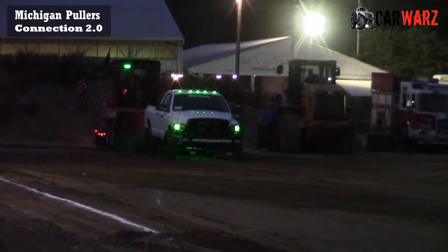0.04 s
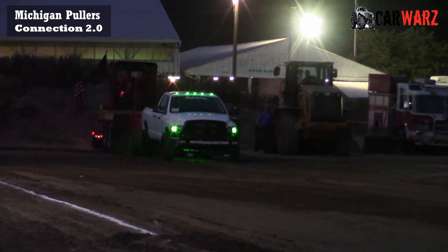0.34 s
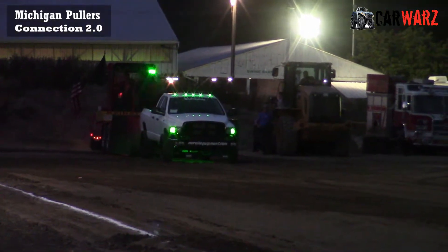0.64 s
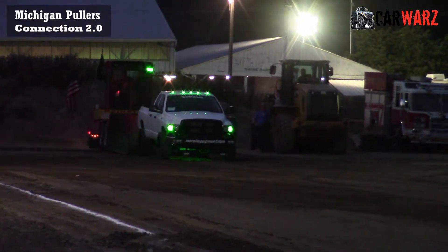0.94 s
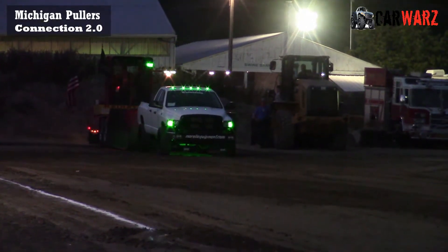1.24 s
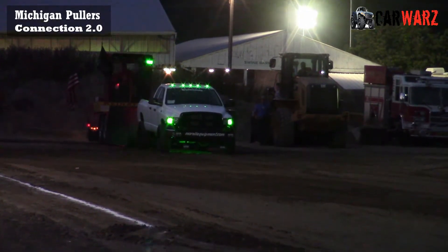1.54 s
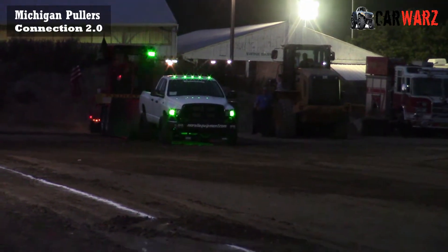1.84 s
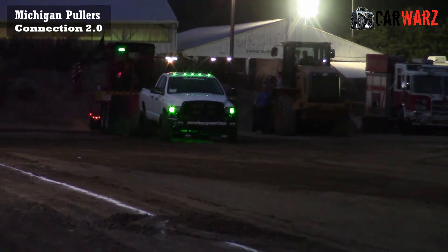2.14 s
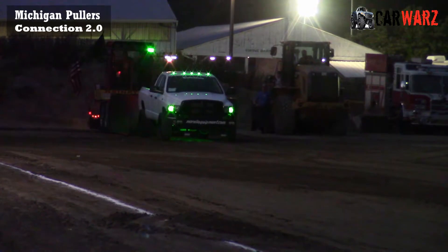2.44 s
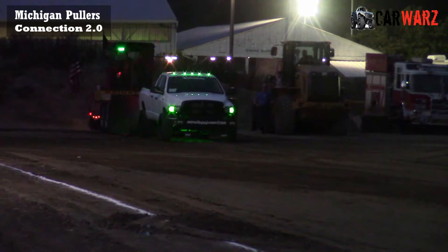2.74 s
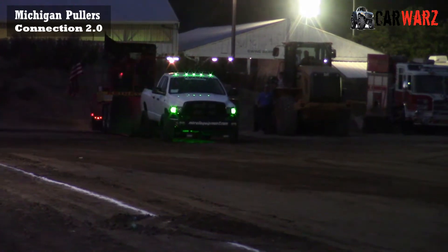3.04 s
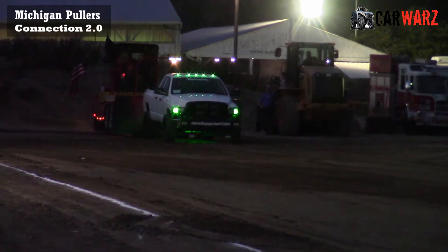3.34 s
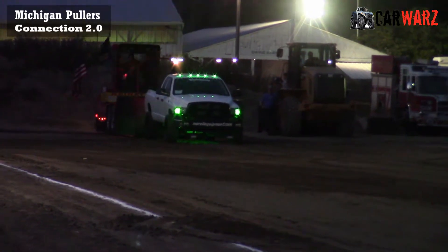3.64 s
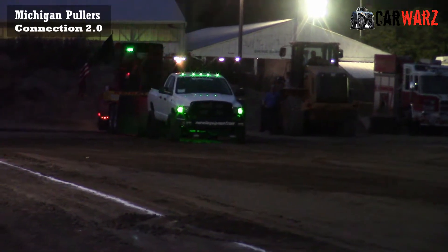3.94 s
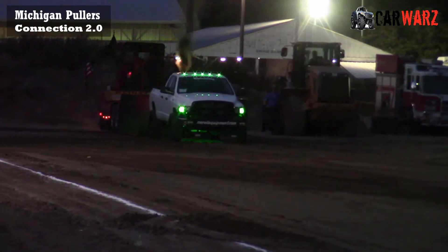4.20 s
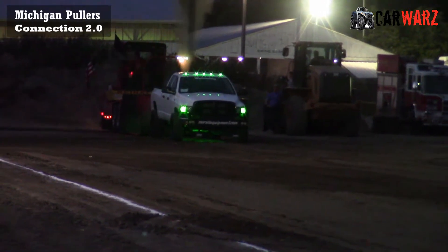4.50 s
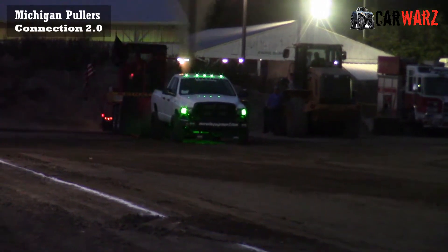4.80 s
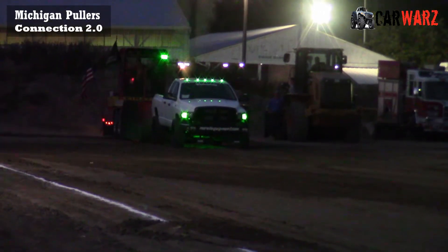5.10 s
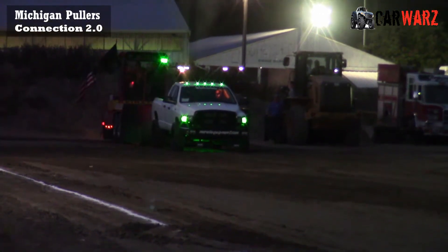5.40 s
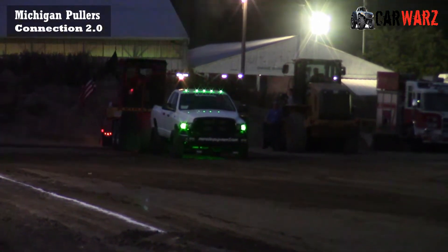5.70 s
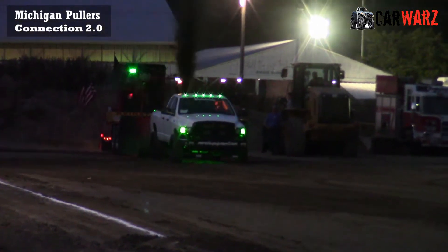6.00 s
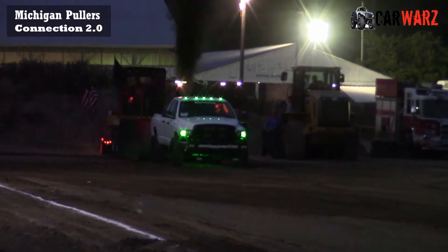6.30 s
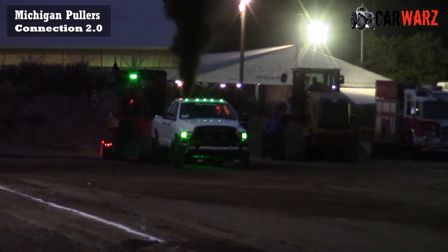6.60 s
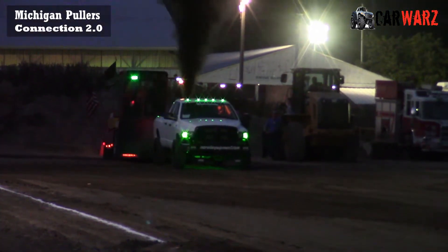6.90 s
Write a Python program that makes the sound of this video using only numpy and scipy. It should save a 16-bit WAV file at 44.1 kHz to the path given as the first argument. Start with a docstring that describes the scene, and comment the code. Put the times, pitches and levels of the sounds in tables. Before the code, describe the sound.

A turbo diesel pickup is already at full throttle, dragging a weight sled on an open dirt track some way off. Its loud exhaust drone, mixed with an uneven rattle and a gassy rasp, rises slowly in pitch and grows stronger, thinning briefly around 1.4 seconds. Tyres and sled add a low rumble, strongest near 1.7 and 4.5 seconds. From the start a thin, fluttering turbo whistle climbs over a hiss of air, becoming very high and fainter by 6 seconds. Two deep thuds come at about 4.6 and 4.8 seconds, the second stronger. At about 6.5 and 6.7 seconds the revs jump and drop as the throttle is cut and reapplied. The exhaust hardens into an even, crackling, metallic bark that continues to the end, just after 7 seconds. Faint short echoes return from the trackside.

```python
"""On an open dirt track, some way off, a six-cylinder turbo diesel pickup drags a rumbling weight sled.
Periodic firing makes the exhaust stack drone; unequal cylinders add a rattle, and turbulent puffs of gas
roar and rasp in the pipe. The turbo's blade tone winds up to a thin whistle over rushing air. Two deep
thuds pass midway. Near the end the revs bounce twice as the throttle is cut and reapplied, and the
exhaust turns to a hard, even bark."""
import sys
import numpy as np
from scipy import signal
from scipy.fft import rfft, irfft, next_fast_len
from scipy.io import wavfile
from scipy.ndimage import uniform_filter1d

SR = 44100
rng = np.random.default_rng(int(sys.argv[2]) if len(sys.argv) > 2 else 0)


def dump(signal):
    """Clip the signal to [-1, 1] and save it as 16-bit WAV at the path in sys.argv[1]."""
    limited = np.clip(np.atleast_2d(signal).T, -1, 1)
    pcm = np.round(limited * 32767).astype(np.int16)
    wavfile.write(sys.argv[1], SR, pcm)


N = 315315
TIME = np.arange(N) / SR

# Levels are relative; an order is a multiple of the four-stroke cycle rate (six firings).
# engine speed under load: time_s, firing_hz
ENGINE_SPEED = [(0.0, 177.2), (0.55, 181.3), (0.95, 185.9), (1.55, 193.6), (2.15, 198.5), (2.5, 199.4),
                (2.85, 201.1), (3.55, 207.7), (3.75, 209.2), (4.35, 212.2), (4.8, 216.8), (5.8, 227.5),
                (5.95, 226.5), (6.1, 224.5), (6.29, 225.8), (6.4, 247.0), (6.57, 240.5), (6.66, 242.0),
                (6.75, 238.8), (6.82, 247.0), (6.9, 244.6), (7.05, 242.5), (7.15, 234.7)]
# fundamental of the stack: time_s, level_db
DRONE_LEVEL = [(0.0, -12), (1.0, -12.5), (1.25, -18), (1.5, -18.5), (1.65, -15), (2.05, -13.5), (3.2, -9),
               (3.65, -11.5), (4.65, -8.5), (4.85, -9.5), (5.24, -6), (5.4, -8), (6.25, -7), (6.34, -10),
               (6.39, -10), (7.05, -7.5), (7.15, -8.5)]
# hardness of the blow-down, heard at twice the firing rate: time_s, level_db
BARK_LEVEL = [(0, -35.5), (.95, -44), (1.14, -24), (1.44, -17), (3.3, -34), (4.8, -26.5), (5.25, -33.5),
              (6, -29), (6.26, -19), (6.35, -25), (6.42, -18.5), (6.51, -20), (6.555, -22.5), (6.605, -20),
              (6.76, -26.5), (6.86, -14.5), (7.0, -17.5), (7.15, -42)]
# imbalance of the cylinders: time_s, even_orders_db, odd_orders_db
IMBALANCE = [(0, -27, -19), (1, -20.5, -16.5), (1.7, -18, -17.5), (2.8, -20.5, -18.8), (3.6, -24, -22),
             (4.5, -21.5, -23.5), (5.2, -24.5, -23.5), (5.8, -23, -20.5), (6.3, -22, -31),
             (7.15, -20.5, -31)]
# spectral lines of the unequal cylinders: order, level_db
LOPE_ORDERS = [(2, -10.2), (3, -19.7), (4, -8.1), (5, -11.9), (7, -2.7), (8, -5.9), (9, -12.6), (10, -6.9),
               (11, -19.1), (13, -14.5), (14, -9.8), (15, -19.2), (16, -10.3), (17, -16.5), (18, -19.3),
               (19, -21.4), (20, -15.5), (21, -21.8), (22, -18.0), (23, -21.5), (24, -20.8), (25, -27.2),
               (26, -18.4), (27, -23.2), (28, -21.9), (29, -30.1), (30, -26.0), (31, -28.3), (32, -26.5),
               (33, -26.5), (34, -30.7), (35, -33.6), (36, -31.9), (37, -34.2)]
# peaks and dips of pipe and trackside: centre_hz, half_width_hz, gain_db, strongest_s, reach_s
TRACK_RESONANCES = [(50, 163, -11.0, 6.73, 0.4), (70, 18, 5.0, 5.27, 0.87), (84, 17, -12.5, 3.1, 0.92),
                    (109, 16, 11.0, 3.75, 0.77), (128, 24, -13.5, 4.9, 0.39), (133, 8, 4.0, 1.88, 0.81),
                    (158, 14, -13.0, 0.99, 2.09), (232, 17, -9.0, 0.31, 0.31), (255, 15, -16.0, 1.85, 0.81),
                    (260, 8, -8.0, 5.81, 0.6), (276, 21, -11.0, 6.96, 0.58), (283, 21, -7.5, 3.35, 0.26),
                    (284, 17, 7.5, 1.4, 0.75), (286, 11, 10.0, 4.19, 0.62), (300, 14, -5.5, 0.08, 0.26),
                    (327, 14, 7.0, 0.06, 0.47), (340, 8, 10.0, 2.24, 2.2), (351, 95, -5.0, 4.42, 1.01),
                    (396, 12, -12.0, 0.65, 0.52), (414, 20, 13.0, 5.65, 0.59), (426, 16, 11.0, 0.88, 1.01),
                    (451, 10, -12.0, 0.0, 2.12), (463, 29, -16.0, 3.47, 0.4), (480, 10, -7.5, 5.29, 0.35),
                    (531, 17, -5.0, 2.49, 0.27), (534, 10, -12.5, 1.12, 0.35), (549, 11, 12.5, 4.53, 2.5),
                    (556, 56, -10.0, 7.01, 1.44), (562, 16, 3.5, 4.1, 0.4), (599, 12, 9.0, 3.45, 0.56),
                    (636, 23, 10, 2.95, 0.1), (651, 15, 7.0, 0.0, 1.95), (653, 21, 12.5, 5.49, 0.45),
                    (697, 12, 7.0, 5.1, 0.38), (699, 14, 7.0, 3.77, 0.33), (720, 16, 11.5, 0.21, 0.45),
                    (735, 12, 4, 6.9, 0.2), (741, 24, 9.0, 6.94, 0.5), (764, 78, 6.0, 2.42, 0.35),
                    (771, 51, -12.0, 4.05, 0.62), (857, 189, -10.0, 6.63, 0.16), (915, 28, 13, 6.45, 0.3),
                    (922, 14, 9.0, 3.53, 2.5), (925, 22, 4.5, 4.3, 0.55), (1010, 21, 10.5, 3.85, 0.39),
                    (1100, 60, 6, 6.9, 0.3)]
# turbulence in the stack: time_s, level_db
ROAR_LEVEL = [(0, -29), (.75, -32), (1.25, -25), (2.8, -25), (2.95, -22), (3.12, -31), (4, -31),
              (4.3, -26.5), (6, -29.5), (6.45, -29), (6.8, -33), (7.15, -33.5)]
# spectrum of the roar: frequency_hz, level_db
ROAR_SPECTRUM = [(70, -30.5), (130, -4), (220, -1), (420, -5), (650, -7), (930, -15), (1250, -30),
                 (2000, -32)]
# shock of each cylinder in firing order: level_db
CYLINDER_LEVELS = [0, -7, -5, -.5, -7, -4.5]
# exhaust rasp: time_s, level_db
RASP_LEVEL = [(0, -38), (1.1, -36), (1.6, -34), (2.15, -36.5), (2.65, -34.5), (2.88, -32), (3.2, -35),
              (4.0, -35), (4.5, -34.5), (4.8, -36), (5.45, -36), (5.68, -31.5), (6, -33), (6.4, -31.5),
              (6.72, -33), (6.9, -30), (7.05, -30.5), (7.15, -35)]
# response of the stack's mouth: frequency_hz, level_db
RASP_SPECTRUM = [(500, -15), (1000, 7.5), (1300, 1.5), (1550, 6), (1900, -1), (2300, 1), (2750, 7.5),
                 (3100, 6), (3500, -10), (4500, -12.5), (7000, -37.5)]
# sharpness of the rasp: time_s, cracks_over_hiss_db
CRACK_RATIO = [(0, -13), (3, -11.5), (5.3, -8.5), (5.7, -11), (6.25, -3), (6.45, -3.5), (6.56, -7),
               (6.66, -3), (6.76, -1), (6.88, 3.5), (7.0, 2.5), (7.15, -2.5)]
# metallic overtones of the bark: order, level_db
SNARL_ORDERS = [(38, -8), (40, -15), (44, -16), (50, -16), (52, -19), (56, -15), (58, -14), (62, -17),
                (64, -14), (66, -11), (68, -15), (70, -15), (72, -13), (74, -15), (76, -18), (78, -17),
                (84, -20), (86, -20)]
# blade tone of the turbo: time_s, pitch_hz
TURBO_PITCH = [(0.0, 4625), (0.6, 4885), (1.92, 5806), (2.96, 6275), (4.44, 7833), (5.2, 9160),
               (5.98, 10500), (6.1, 10960), (6.3, 12100), (6.46, 12380), (6.56, 12720), (6.66, 12400),
               (6.75, 12680), (6.88, 12440), (7.15, 12200)]
# whistle as it carries through the air: time_s, level_db
WHISTLE_LEVEL = [(0.0, -41), (0.05, -35), (0.14, -44), (0.45, -42.5), (0.6, -38), (1.08, -52), (1.42, -42),
                 (1.53, -36.5), (1.75, -38), (1.86, -41), (1.95, -39.5), (2.15, -46), (2.34, -37.5),
                 (2.5, -36), (2.65, -39.5), (2.88, -43), (3.02, -37), (3.41, -48.5), (3.65, -43),
                 (3.73, -49.5), (3.81, -41), (3.92, -49), (4.02, -43.5), (4.3, -43.5), (4.4, -34.5),
                 (4.6, -39.5), (4.75, -36), (5.05, -44), (5.3, -47), (5.39, -56.5), (5.49, -43), (5.6, -51),
                 (5.7, -46), (5.8, -53.5), (6.08, -55), (6.16, -47), (6.26, -55), (6.55, -55.5),
                 (6.9, -57.5), (7.15, -54)]
# rushing air: time_s, level_db
AIR_LEVEL = [(0, -53), (1.45, -43), (2.15, -47.5), (2.9, -50), (4.6, -46.5), (5.35, -53.5), (5.7, -52.5),
             (6.25, -46.5), (6.7, -51), (7.15, -50.5)]
# spectrum of the air: frequency_hz, level_db
AIR_SPECTRUM = [(2500, -13.5), (3500, -6), (3900, -6), (4250, 4.5), (4700, 4.5), (5100, 1.5), (5500, 0.5),
                (6400, -4), (7200, -12), (8500, -17), (11000, -29), (14000, -40)]
# ground rumble of tyres and sled: time_s, level_db
RUMBLE_LEVEL = [(0, -28.5), (1, -31), (1.3, -29), (1.7, -21.5), (4.05, -34.5), (4.45, -24.5), (5.9, -33.5),
                (7.15, -39.5)]
# spectrum of the rumble: frequency_hz, level_db
RUMBLE_SPECTRUM = [(8.8, -32.5), (15, -0.5), (43, -2), (70, -2), (97, -1.5), (125, -3), (160, -26),
                   (280, -120)]
# returns from sheds and parked machines: delay_s, level_db
REFLECTIONS = [(.023, -13), (.061, -16), (.118, -19)]
# deep thuds: peak_s, level_db, inverse_duration_hz
THUD_PULSES = [(4.61, -22, 22), (4.82, -13, 24)]
# the revs shoot up and the throttle is cut: cut_s, overshoot_hz
THROTTLE_CUTS = [(6.48, 16), (6.664, 20)]


def undb(db):
    """The decibel law: 20 dB is a tenfold amplitude."""
    return 10 ** (np.asarray(db) / 20)


def curves(table):
    """Linear interpolation of each column of a table over time."""
    times, *columns = np.transpose(table)
    return [np.interp(TIME, times, column) for column in columns]


def unit(x):
    """Normalisation to rms 1."""
    return x / np.sqrt(np.mean(x ** 2))


def noise():
    """Gaussian white noise: equal power at all frequencies."""
    return rng.standard_normal(N)


def walk(rate_hz):
    """Random modulation: levels held for 1 / rate_hz seconds and smoothed twice; rms 1."""
    hold = max(int(SR / rate_hz), 20)
    steps = np.repeat(rng.standard_normal(N // 20 + 1)[:N // hold + 1], hold)
    return unit(uniform_filter1d(uniform_filter1d(steps, hold), hold)[:N])


def colour(x, spectrum):
    """Minimum-phase filtering by a spectrum that rolls off beyond its ends; rms 1."""
    size = next_fast_len(N + SR // 2, True) // 2 * 2
    hz, db = np.transpose(spectrum)
    log_hz = np.log(np.maximum(np.arange(size // 2 + 1) * SR / size, 1))
    outside = np.abs(log_hz - np.clip(log_hz, np.log(hz[0]), np.log(hz[-1])))
    log_gain = np.log(undb(np.interp(log_hz, np.log(hz), db))) - 2 * outside
    cepstrum = irfft(log_gain, size)
    cepstrum[1:size // 2] *= 2  # folding onto positive time makes the filter causal
    cepstrum[size // 2 + 1:] = 0
    return unit(irfft(rfft(x, size) * np.exp(rfft(cepstrum)), size)[:N])


def tone(turns):
    """Simple harmonic motion of rms 1, its phase given in turns."""
    return np.sqrt(2) * np.sin(2 * np.pi * turns)


def fading(turns, depth, rate_hz):
    """Multipath interference: a tone meets its scattered copies, so it swells and drops out."""
    in_phase = (1 + depth * walk(rate_hz)) * tone(turns)
    quadrature = depth * walk(rate_hz) * tone(turns + 1 / 4)
    return (in_phase + quadrature) / np.sqrt(1 + 2 * depth ** 2)


def firing_rate():
    """The fundamental frequency follows engine speed: the climb under load plus the overshoots."""
    return curves(ENGINE_SPEED)[0] + overshoot()


def drone(firings, drone_db=0.56, waver_db=0.5, null_s=1.374, null_width_s=0.17, leak_db=-11):
    """Wave steepening: the nearly round firing wave gains an octave as it tends to a sawtooth."""
    # an overshoot thins the drone and hardens the bark
    level_db = curves(DRONE_LEVEL)[0] - 0.04 * overshoot()
    octave_db = curves(BARK_LEVEL)[0] + 0.26 * overshoot()
    # destructive interference: a reflection all but cancels the drone, which comes back inverted
    polarity = np.tanh((TIME - null_s) / null_width_s)
    leak = undb(leak_db) * (1 - polarity ** 2)
    fundamental = polarity * tone(firings) - leak * tone(firings + 1 / 4)
    gain = undb(level_db + drone_db + waver_db * walk(30))
    return gain * fundamental - undb(octave_db) * tone(2 * firings)


def lope(firings, swell_db=1, lag_firings=0.419):
    """Periodicity: unequal cylinders repeat every six firings, so they rattle at orders of that cycle."""
    even_db, odd_db = (db + swell_db * walk(hz) for db, hz in zip(curves(IMBALANCE), (9, 10)))
    cycle_hz, cycles = firing_rate() / 6, (firings - lag_firings) / 6
    rattle = 0
    for order, db in LOPE_ORDERS:
        boom = resonance(order * cycle_hz)
        gain = undb(db + (odd_db if order % 2 else even_db)) * boom
        depth = min(.08 + .01 * order, .3) / np.maximum(boom, 1)  # high, unboosted orders fade most
        turns = order * cycles - order ** 2 / 12  # quadratic phase spreads the energy over the cycle
        rattle += gain * fading(turns, depth, rate_hz=12)
    return rattle


def resonance(pitch_hz):
    """Resonance: a partial's gain as it sweeps through peaks and dips, each on one stretch of track."""
    t, hz = TIME[::256], pitch_hz[::256]
    gain_db = sum(db * np.exp(-((hz - centre_hz) / width_hz) ** 2 - ((t - strongest_s) / reach_s) ** 2)
                  for centre_hz, width_hz, db, strongest_s, reach_s in TRACK_RESONANCES)
    return np.interp(TIME, t, undb(gain_db))


def roar(firings, knock_gain=0.73, lag_firings=.6):
    """Broadband excitation: turbulent puffs and uneven knocks boom in the stack."""
    knocks = shocks(firings - lag_firings, scatter_db=1.9, jitter_firings=.03) * np.clip(noise(), -2, 2)
    gas = puffs(firings - lag_firings, decay_firings=0.94)
    return undb(curves(ROAR_LEVEL)[0]) * colour(gas + knock_gain * knocks, ROAR_SPECTRUM)


def shocks(firings, scatter_db, jitter_firings):
    """An impulse train: one shock a firing, sized by its cylinder, scattered in level and timing."""
    count = np.floor(firings + jitter_firings * walk(200)).astype(int)
    size = undb(np.array(CYLINDER_LEVELS)[count % 6] + scatter_db * rng.uniform(-1, 1, N))
    return unit(np.diff(count, prepend=count[0]) * size)


def puffs(firings, decay_firings):
    """Pulsed turbulence: noise that jumps at each firing and decays exponentially."""
    return noise() * unit(np.exp(-(firings % 1) / decay_firings))


def rasp(firings, rasp_db=2.0, surge_db=.5, lag_firings=.6):
    """Source and filter: each firing sends a shock and a burst of gas through the ringing stack mouth."""
    gain = undb(curves(RASP_LEVEL)[0] + rasp_db + surge_db * walk(14))
    impulses = shocks(firings - lag_firings, scatter_db=2, jitter_firings=0.0045)
    cracks = unit(impulses * (1.5 + np.clip(noise(), -1, 1)))
    gas = puffs(firings - lag_firings, decay_firings=.75)
    ratio = undb(curves(CRACK_RATIO)[0])
    total = np.sqrt(1 + ratio ** 2)
    mouth = colour((gas - ratio * cracks) / total, RASP_SPECTRUM)
    return gain * (mouth + snarl(firings) * ratio / total)  # the metal rings more as cracks dominate


def snarl(firings, snarl_db=1, flare_db=3.5):
    """Forced vibration: high orders ring in the metal of the stack, each flaring on its own."""
    ring = 0
    for order, db in SNARL_ORDERS:
        flare = unit(undb(flare_db * walk(14)))
        ring += undb(db) * flare * fading(order * firings / 6 + rng.random(), depth=.22, rate_hz=30)
    return undb(snarl_db) * ring


def turbo(firings, flutter_db=1.1, octave_db=-59, octave_flutter_db=3, skirt_db=-17, skirt_boost_db=5.5):
    """Modulation of a blade tone: exhaust throb and a skirt of turbulent sidebands grow with boost."""
    (pitch_hz,), (level_db,) = curves(TURBO_PITCH), curves(WHISTLE_LEVEL)
    boost = (pitch_hz / pitch_hz.max()) ** 2
    wander = (.0005 + .001 * boost ** 2) * walk(90) + .0006 * walk(14)
    turns = np.cumsum(pitch_hz * (1 + wander)) / SR
    throb = 1 + (.07 + .5 * boost) * tone(firings)
    blade = fading(turns, depth=.3, rate_hz=60) * throb
    sidebands = walk(840) * tone(turns) + walk(840) * tone(turns + 1 / 4)
    skirt = undb(skirt_db + skirt_boost_db * boost) * sidebands
    # the octave is rougher and flutters more in the moving air
    octave_flutter = unit(undb(octave_flutter_db * walk(22)))
    octave = octave_flutter * fading(2 * turns, depth=.5, rate_hz=160) * throb
    octave_gain = undb(octave_db) * np.minimum(pitch_hz / 7100, 1)
    return undb(level_db + flutter_db * walk(18)) * (blade + skirt) + octave_gain * octave


def rushing_air(air_db=4, flicker_db=1.3):
    """Flow noise: a band of treble hiss whose level flickers."""
    return undb(curves(AIR_LEVEL)[0] + air_db + flicker_db * walk(14)) * colour(noise(), AIR_SPECTRUM)


def ground_rumble(rumble_db=1, swell_db=2):
    """Random vibration: tyres and sled shake the ground at low frequencies."""
    gain = undb(curves(RUMBLE_LEVEL)[0] + rumble_db + swell_db * walk(12))
    return gain * colour(noise(), RUMBLE_SPECTRUM)


def echoes(x):
    """Reflection: the direct sound plus delayed, weaker returns from around the track."""
    return x + sum(undb(db) * np.interp(TIME - delay_s, TIME, x, left=0) for delay_s, db in REFLECTIONS)


def thuds():
    """Gaussian pulses: single slow swings of pressure, with their energy in the deep bass."""
    return sum(undb(db) * np.exp(-((TIME - peak_s) * hz * 2) ** 2) * np.cos(np.pi * hz * (TIME - peak_s))
               for peak_s, db, hz in THUD_PULSES)


def overshoot(ramp_s=.09):
    """Frequency modulation: the firing rate's excess in Hz rises to each throttle cut and falls back."""
    return sum(hz * np.maximum(1 - np.abs(TIME - cut_s) / ramp_s, 0) for cut_s, hz in THROTTLE_CUTS)


def scene(treble_right_db=1.44, side_db=-26, drone_side_db=-34, rumble_side_db=-23, side_delay_s=.012):
    """Superposition: engine, turbo and sled add straight ahead; the treble leans a little right."""
    firings = np.cumsum(firing_rate() * (1 + .001 * walk(20))) / SR  # phase, one turn a firing
    air = rushing_air()
    rumble, rumble_side = ground_rumble(), ground_rumble()
    stack = drone(firings)
    body = lope(firings) + roar(firings)
    treble = echoes(rasp(firings) + air) + turbo(firings)
    # a weak late return arrives from the side
    reflected = undb(side_db) * (treble + body) + undb(drone_side_db) * stack
    side = np.interp(TIME - side_delay_s, TIME, reflected, left=0) + undb(rumble_side_db) * rumble_side
    ears = np.array([[1], [-1]])  # left, right
    return stack + body + rumble + thuds() + treble * undb(-ears * treble_right_db / 2) + ears * side


def record(dry, ceiling=.95, top_hz=14400):
    """Saturation and band limiting: the highest peaks are rounded and the top treble is cut."""
    rounded = dry / (1 + (dry / ceiling) ** 8) ** (1 / 8)
    return signal.sosfilt(signal.ellip(10, .2, 80, top_hz, fs=SR, output="sos"), rounded)


dry = scene()
out = record(dry)
dump(out)
```